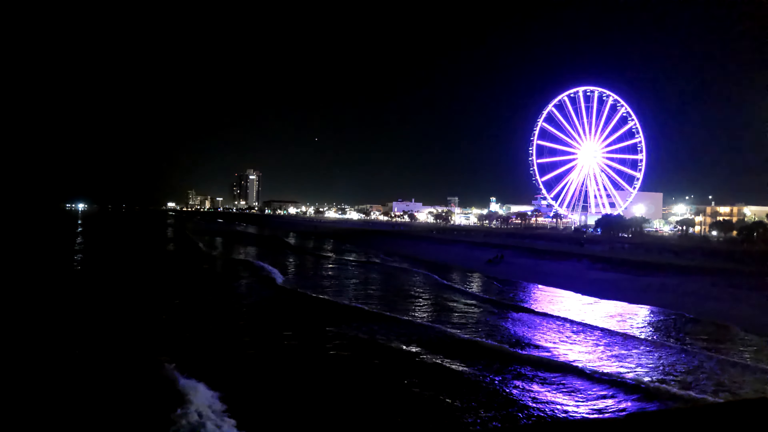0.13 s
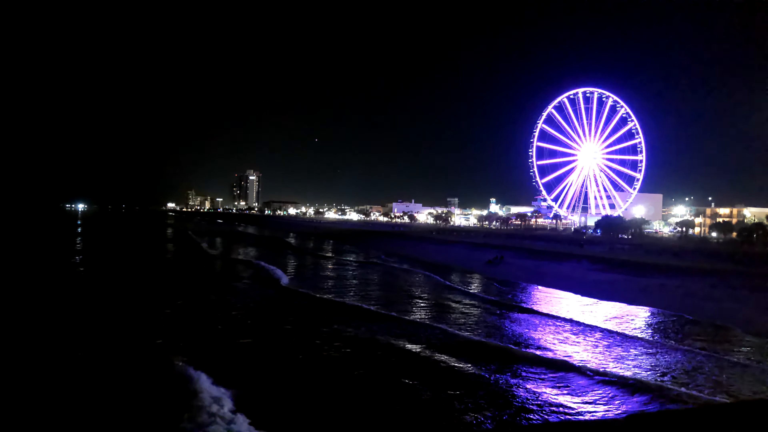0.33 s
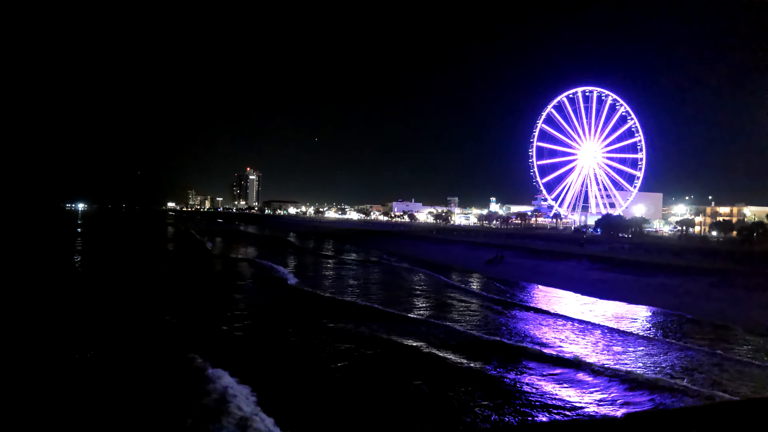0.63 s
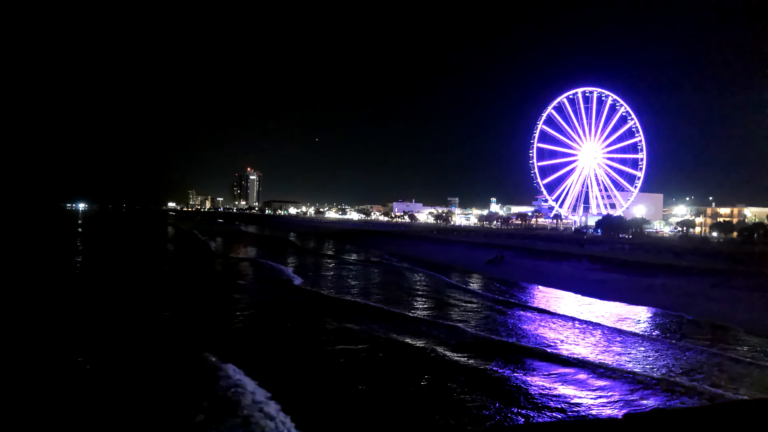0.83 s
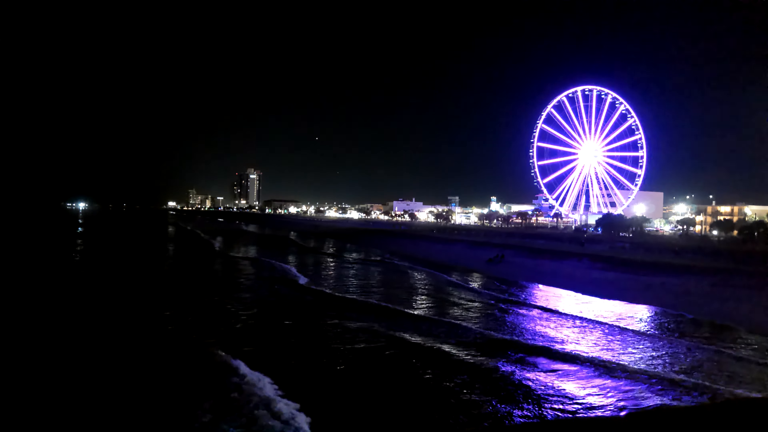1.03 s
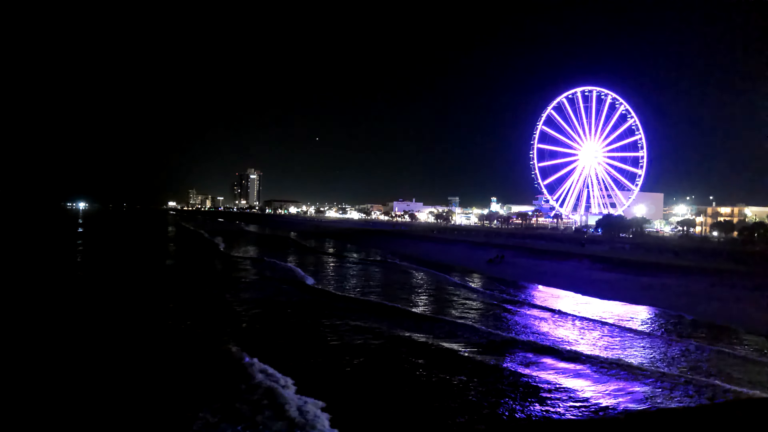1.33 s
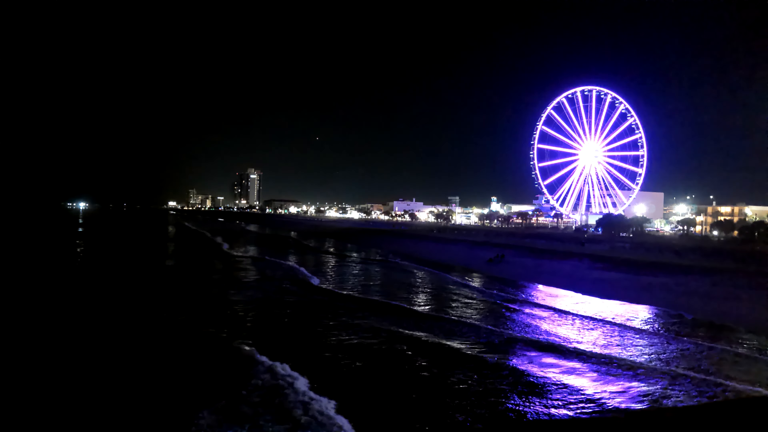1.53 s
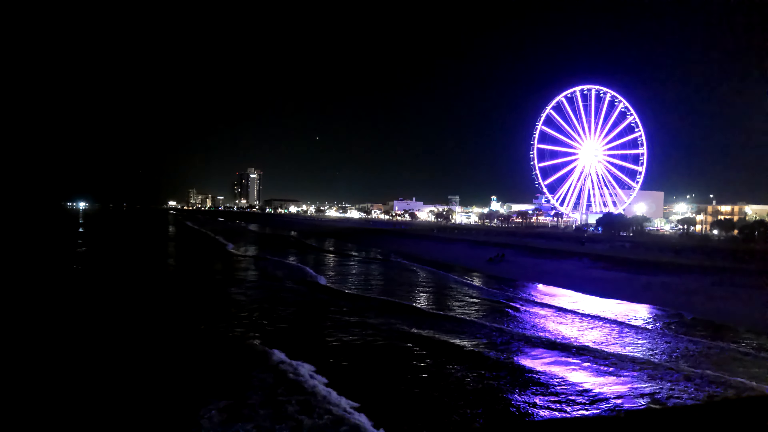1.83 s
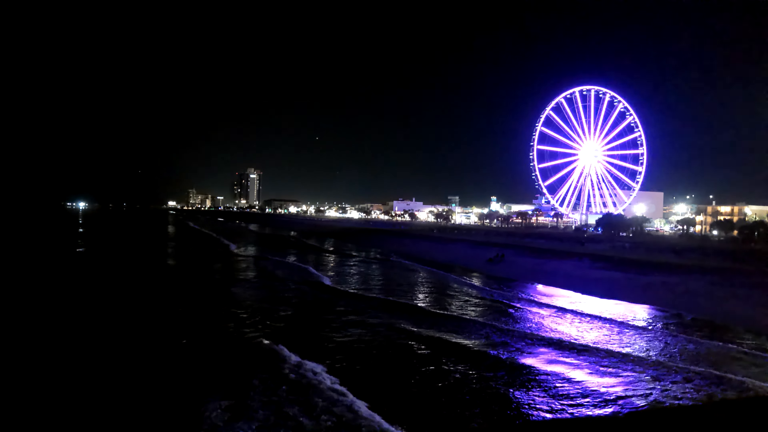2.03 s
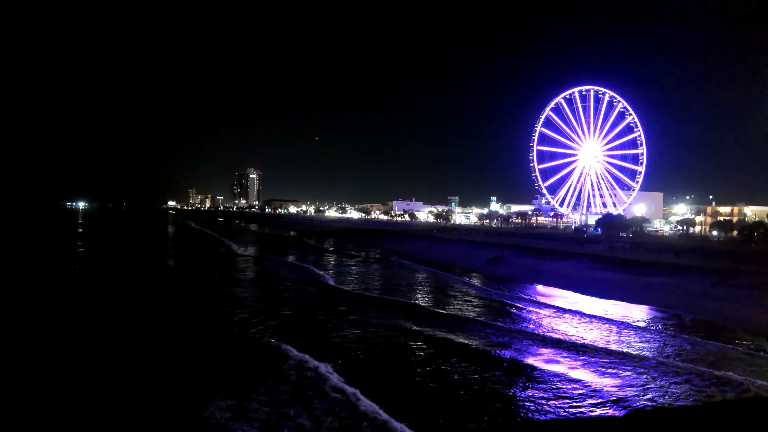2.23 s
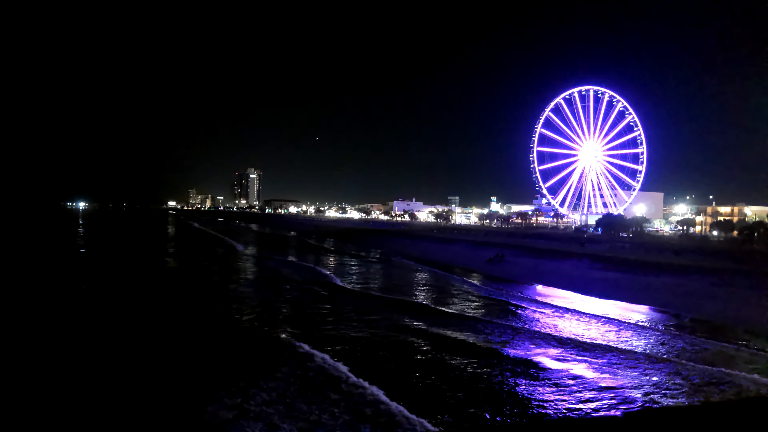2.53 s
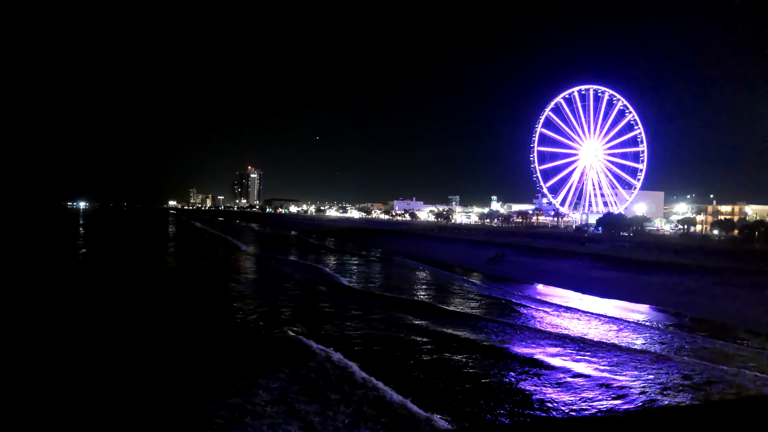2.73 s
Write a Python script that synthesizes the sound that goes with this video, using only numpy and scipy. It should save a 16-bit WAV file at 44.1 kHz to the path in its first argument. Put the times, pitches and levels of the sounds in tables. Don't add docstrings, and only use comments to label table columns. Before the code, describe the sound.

An ocean wave dies away on a beach at night. Its low, muffled roar is strongest in the first 0.3 seconds, with soft watery gulps, then sinks steadily until the end near 2.9. Fine foam hisses and crackles throughout, thinning after 1.5, with faint bubble plops between 0.4 and 1.8. A small sharp droplet tick lands at 1.1. Wind and distant traffic rumble quietly underneath.

```python
import sys
import numpy as np
from scipy import signal
from scipy.fft import rfft, irfft
from scipy.io import wavfile
from scipy.ndimage import uniform_filter1d

SR = 44100
rng = np.random.default_rng(int(sys.argv[2]) if len(sys.argv) > 2 else 0)


def decibels_to_gain(level_db):
    exponent = np.asarray(level_db, float) / 20
    return 10 ** exponent


def master(y):
    cut = np.clip(np.atleast_2d(y).T, -1, 1)
    pcm = np.round(cut * 32767)
    wavfile.write(sys.argv[1], SR, pcm.astype(np.int16))


N = 126567

# (time [s], level [dB])
BREAKER_FORCE = [(0, -15.5), (.06, -17.5), (.12, -15.5), (.2, -18), (.29, -16), (.34, -19), (.66, -19.5),
                 (.82, -19.5), (.95, -19.5), (1.06, -20), (1.2, -19.5), (1.4, -21.5), (1.6, -21.5),
                 (1.82, -22.5), (1.95, -22.5), (2.2, -23), (2.5, -23), (2.87, -24.5)]
# (frequency [Hz], density [dB per Hz])
ROAR_COLOUR = [(60, -17), (150, -2), (260, 0), (400, -2), (550, -7.5), (900, -16.5), (1500, -28),
               (3000, -57)]
# (time [s], level [dB], pitch [Hz])
LOW_SWELLS = [(.09, -31, 550), (.147, -15, 273), (.19, -16, 232), (.212, -18.5, 378.5), (.255, -21, 255),
              (.27, -22.5, 345), (0.602, -24, 305), (.93, -20, 252), (1.56, -21, 330), (1.815, -21, 295),
              (2.6, -33, 613)]
# (time [s], level [dB])
FOAM_AMOUNT = [(0, -42.5), (.2, -43), (.45, -41.5), (.55, -42), (.7, -43.5), (.8, -44.5), (.86, -44.5),
               (1.3, -45), (1.42, -44.5), (1.6, -50), (1.74, -49), (1.84, -47), (2.1, -46.5), (2.3, -47.5),
               (2.55, -47), (2.7, -48.5), (2.87, -48.5)]
# (frequency [Hz], density [dB per Hz])
FIZZ_COLOUR = [(700, -17), (1500, -1), (2500, 3.5), (4000, -4), (5500, -18), (8000, -23.5), (11000, -34.5),
               (14000, -49)]
# (time [s], lift [dB])
EDGE_NEARNESS = [(0, 3), (.3, -0.5), (.5, 0), (.6, 1), (.7, 1), (.8, 2.5), (.9, 1.5), (1.3, 0),
                 (1.42, -0.5), (1.52, 4), (1.62, 6.5), (1.7, 6.5), (1.78, 1.5), (1.86, -1), (2.3, -0.5),
                 (2.87, -2)]
# (frequency [Hz], density [dB per Hz])
SPRAY_COLOUR = [(3000, -18), (9000, 4), (11500, 3), (12500, -12), (14500, -13), (15600, -10)]
# (time [s], level [dB], pitch [Hz], t60 [s])
LARGE_BUBBLES = [(.377, -31, 1800, .02), (.488, -33, 1800, .022), (.545, -33, 2300, .022),
                 (.56, -36, 2900, .015), (.61, -36, 3600, .015), (.69, -35, 3400, .015),
                 (.70, -37, 4300, .012), (.79, -34, 2100, .022), (.8984, -30, 2200, .02),
                 (1.0858, -24, 2250, .014), (1.111, -32, 3000, .014), (1.1168, -23, 2150, .026),
                 (1.52, -36, 2850, .025), (1.65, -38, 3900, .015), (1.69, -38, 3500, .02),
                 (1.74, -37, 3250, .025), (1.7749, -33, 1600, .02)]
# (time [s], level [dB])
DROPLET_HITS = [
    (1.1142, -35),
    (1.1166, -35),
    (1.1190, -46),
]
# (frequency [Hz], level [dB])
SNAP_COLOUR = [(1000, -12), (2600, -3), (4300, -5), (5800, -13), (8500, -8), (12000, -10), (14200, -22),
               (15600, -18)]
# (frequency [Hz], level [dB], t60 [s])
SHELL_MODES = [
    (4100, 1.5, .011),
    (4600, -3, .009),
    (8200, -11, .010),
]
# (time [s], level [dB])
GUST_LEVEL = [(0, 0.5), (.2, -1), (.45, 1), (.75, 0.5), (.95, 5.5), (1.05, -1), (1.15, -11), (1.32, 2),
              (1.47, 3), (1.65, 0), (1.85, 2), (2.05, -1), (2.3, -2.5), (2.87, -3)]
# (frequency [Hz], density [dB per Hz])
RUMBLE_COLOUR = [(10, -6), (25, -6), (45, -1), (70, 2), (110, -1.5), (200, -12.5), (400, -44), (1000, -59)]
# (frequency [Hz], width [Hz], lift [dB])
HOUSING_MODES = [(345, 29, 1), (868, 62, -3.5), (1177, 100, 8.5), (1777, 110, 6), (2307, 192, 5.5),
                 (2535, 89, -6.5), (2870, 74, 3), (3284, 77, -1.5), (3310, 98, 3.5), (3610, 63, 2),
                 (3900, 220, -1), (4560, 260, 7), (4980, 120, -5), (5510, 540, 6), (6950, 460, 4.5),
                 (7450, 110, -2), (10300, 630, 1)]

SWELL_S = 0.015
FIZZ_LIFT_DB, POPS_DB, POPS_PER_S = 3.5, -11, 3000
BRIGHT_HZ = 3000
SPRAY_DB, SPRAY_FOLLOWS_DB_PER_DB = -70, 0.6
SNAP_T60_S = 0.013
RUMBLE_DB = -28
DUCK_DB, DUCK_S, DUCK_HZ = -20, 0.013, 7600
SPARED_HZ, SPARED_WIDTH_HZ = 10300, 350
PIT_SHARE, PIT_DB, PIT_HZ, PIT_WIDTH_HZ = 0.24, -14, 13900, 1200
BAND_LIMIT_HZ, OPEN_S = 15720, 0.002


def evened(x):
    return x / np.sqrt(np.mean(x ** 2) + 1e-20)


def read(points, hz):
    f, value = np.transpose(points)
    return np.interp(np.log(hz + 1), np.log(f + 1), value)


def curve(points):
    s, value = np.transpose(points)
    return uniform_filter1d(np.interp(np.arange(N) / SR, s, value), size=800)


def bell(f, centre_hz, width_hz):
    return np.exp(-0.5 * ((f - centre_hz) / width_hz) ** 2)


def coloured(x, gain_db):
    x = np.pad(x, 1024, "reflect")
    gain = decibels_to_gain(gain_db(np.fft.rfftfreq(len(x), 1 / SR)))
    return irfft(rfft(x) * gain, len(x))[1024:-1024]


def churn(colour, patchy_db, flicker_db, size):
    hop = size // 4
    frames, hz = N // hop + 5, np.fft.rfftfreq(size, 1 / SR)
    a, b, patches, flicker = rng.standard_normal((frames, len(hz), 4)).T
    patches = uniform_filter1d(patches, size=10, axis=0)
    patches = evened(uniform_filter1d(patches, size=10, axis=1))
    flicker = uniform_filter1d(flicker, size=len(hz) // 2, axis=0)
    flicker = evened(uniform_filter1d(flicker, size=2, axis=1))
    level_db = read(colour, hz)[:, None] + patchy_db * patches + flicker_db * flicker
    z = (a + 1j * b) * decibels_to_gain(level_db)
    return evened(signal.istft(z, nperseg=size, noverlap=size - hop)[1][:N])


def roar():
    return decibels_to_gain(curve(BREAKER_FORCE)) * churn(ROAR_COLOUR, patchy_db=-0.64, flicker_db=0.24, size=2048)


def low_swells():
    t, out = np.arange(N) / SR, np.zeros(N)
    for s, db, hz in LOW_SWELLS:
        swell = np.exp(-0.5 * ((t - s) / SWELL_S) ** 2)
        out += decibels_to_gain(db) * swell * np.sin(2 * np.pi * hz * (t - s))
    return out


def bubble_pops():
    size = decibels_to_gain(4.8 * np.minimum(rng.exponential(1, N), 4))
    size *= rng.random(N) < POPS_PER_S / SR
    kind = rng.integers(0, 24, N)
    t, pops = np.arange(300) / SR, np.zeros(N)
    for k, hz in enumerate(np.geomspace(1500, 14000, num=24)):
        pop = np.sin(2 * np.pi * hz * t) * (hz * t) * np.exp(-hz * t / 2.03)
        pops += signal.oaconvolve(size * (kind == k), pop * hz * decibels_to_gain(read(FIZZ_COLOUR, hz)))[:N]
    return evened(pops)


def foam():
    sheet = churn(FIZZ_COLOUR, patchy_db=0.8, flicker_db=0.7, size=512)
    fizz = decibels_to_gain(FIZZ_LIFT_DB + curve(FOAM_AMOUNT)) * evened(sheet + decibels_to_gain(POPS_DB) * bubble_pops())

    def bright_db(f):
        return -10 * np.log10(1 + (BRIGHT_HZ / (f + 1)) ** 4 + (f / (2.1 * BRIGHT_HZ)) ** 4)

    return fizz + (decibels_to_gain(curve(EDGE_NEARNESS)) - 1) * coloured(fizz, bright_db)


def spray():
    force_db = curve(FOAM_AMOUNT)
    level_db = SPRAY_DB + SPRAY_FOLLOWS_DB_PER_DB * (force_db - force_db.mean())
    return decibels_to_gain(level_db) * churn(SPRAY_COLOUR, patchy_db=0.6, flicker_db=0.4, size=512)


def plops():
    t, out = np.arange(1200) / SR, np.zeros(N)
    attack = np.minimum(t / 0.00048, 1)
    for s, db, hz, t60_s in LARGE_BUBBLES:
        tone = np.sin(2 * np.pi * hz * t * (1 + 6 * t))
        out[round(s * SR):][:len(t)] += decibels_to_gain(db - 60 * t / t60_s) * attack * tone
    return out


def droplet():
    t, out = np.arange(1500) / SR, np.zeros(N)
    attack = np.minimum(t / 0.0006, 1)
    ring = np.zeros(len(t))
    for hz, level_db, t60_s in SHELL_MODES:
        ring += decibels_to_gain(level_db - 60 * t / t60_s) * np.sin(2 * np.pi * hz * t * (1 + 15 * t))
    for s, db in DROPLET_HITS:
        noise = evened(coloured(rng.standard_normal(len(t)), lambda f: read(SNAP_COLOUR, f)))
        snap = noise * decibels_to_gain(-60 * t / SNAP_T60_S)
        out[round(s * SR):][:len(t)] += decibels_to_gain(db + 7.0) * attack * (0.49 * snap + ring)
    return out


def rumble():
    return decibels_to_gain(RUMBLE_DB + curve(GUST_LEVEL)) * churn(RUMBLE_COLOUR, patchy_db=1.7, flicker_db=-1.1, size=4096)


def housed(x):
    return coloured(x, lambda f: sum(db * bell(f, hz, width_hz) for hz, width_hz, db in HOUSING_MODES))


def ducked(x):
    def top_db(f):
        return -10 * np.log10(1 + (DUCK_HZ / (f + 1)) ** 12) - 30 * bell(f, SPARED_HZ, SPARED_WIDTH_HZ)

    since_s = np.arange(N) / SR - DROPLET_HITS[-1][0] - 0.002
    duck = decibels_to_gain(DUCK_DB * (since_s > 0) * (since_s < DUCK_S))
    return x + (uniform_filter1d(duck, size=60) - 1) * coloured(x, top_db)


def pitted(x):
    hz, t, z = signal.stft(np.pad(x, 1024, "reflect"), SR, nperseg=512, noverlap=384)
    cells = rng.random((len(t) // 3 + 1, len(hz) // 6 + 1))
    cells = cells.repeat(3, 0).repeat(6, 1)[:len(t), :len(hz)].T
    share = PIT_SHARE * bell(hz, PIT_HZ, PIT_WIDTH_HZ)[:, None]
    z = z * decibels_to_gain(PIT_DB * (cells < share))
    return signal.istft(z, SR, nperseg=512, noverlap=384)[1][1024:][:N]


def scene():
    sea = housed(roar() + low_swells() + foam() + rumble()) + spray()
    return (pitted(ducked(sea)) + droplet() + plops())[None]


def roll_off(x):
    return signal.sosfilt(signal.butter(12, 16120, fs=SR, output="sos"), x)


def record(dry):
    limited = coloured(dry[0], lambda f: -np.clip((f - BAND_LIMIT_HZ) / 3, 0, 70))
    t = np.arange(N) / SR
    to_end_s = np.minimum(t, t[::-1])
    ends = np.sin(np.pi / 2 * np.minimum(to_end_s / OPEN_S, 1)) ** 2
    return roll_off((limited * ends)[None])


dry = scene()
out = record(dry)
master(out)
```